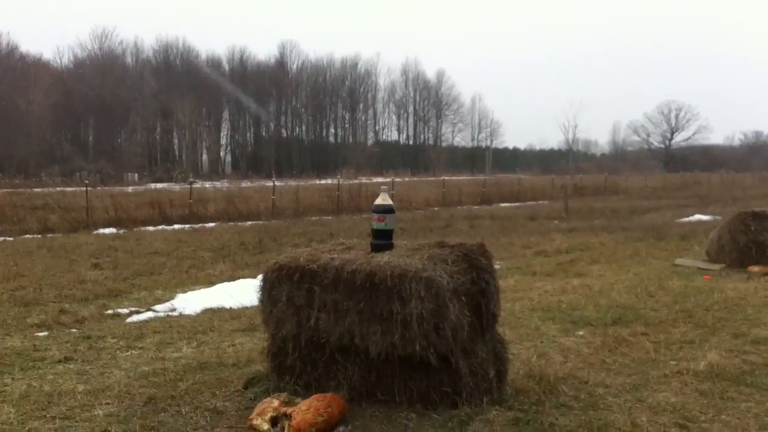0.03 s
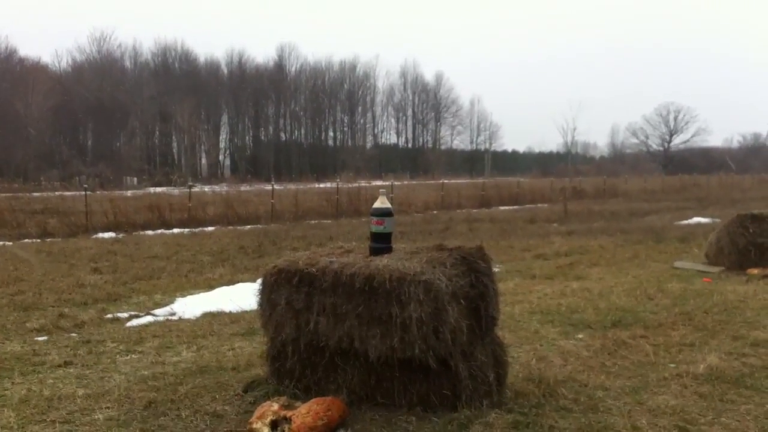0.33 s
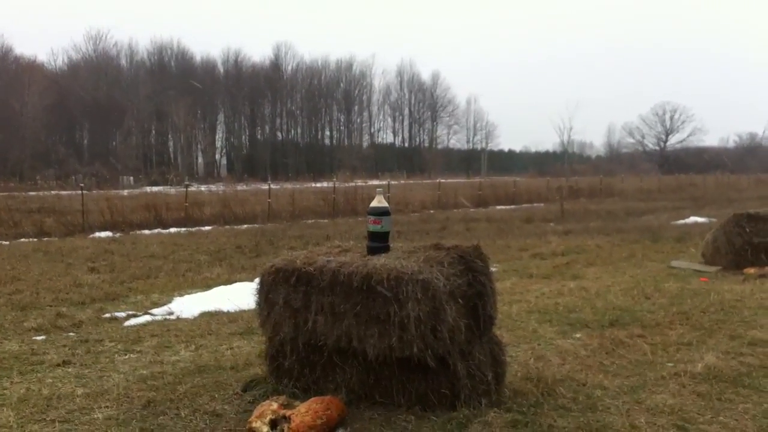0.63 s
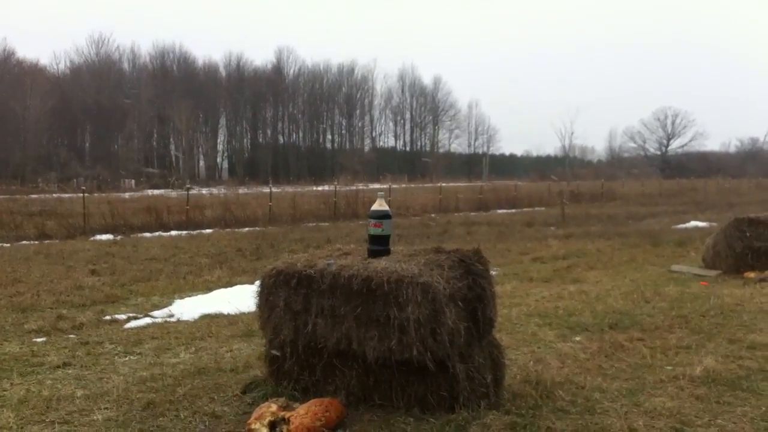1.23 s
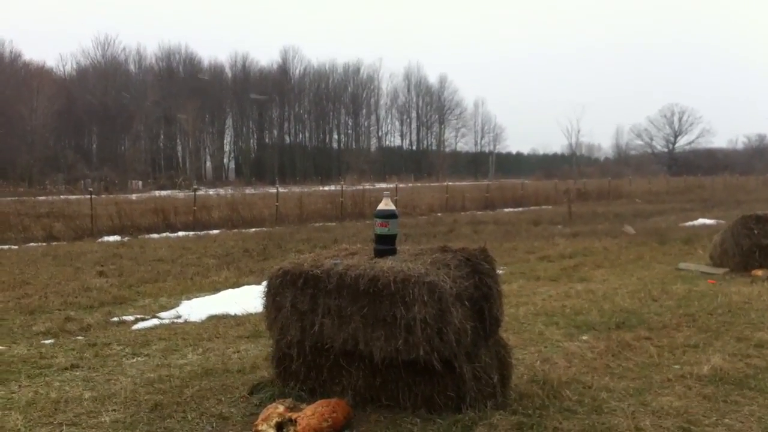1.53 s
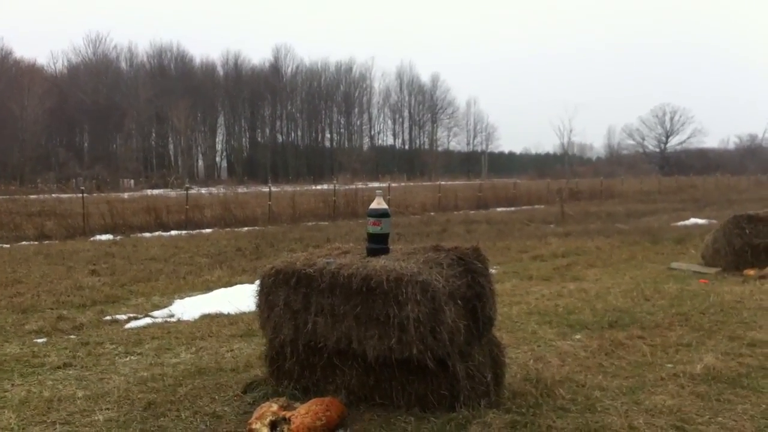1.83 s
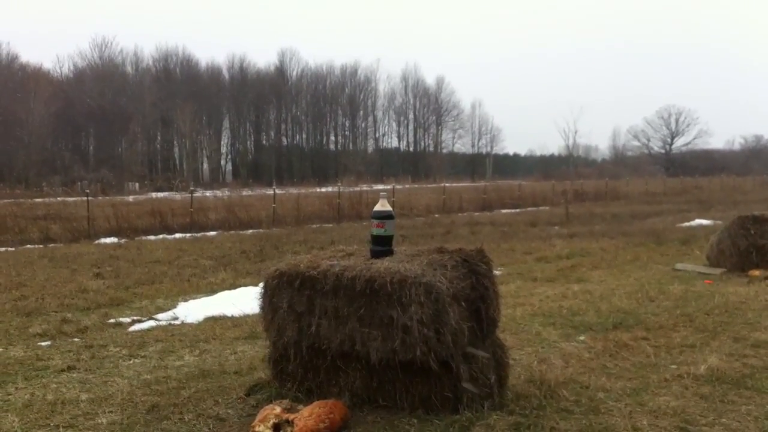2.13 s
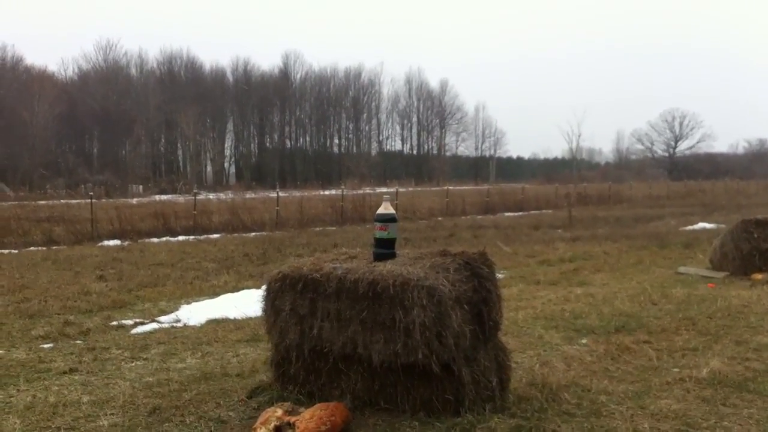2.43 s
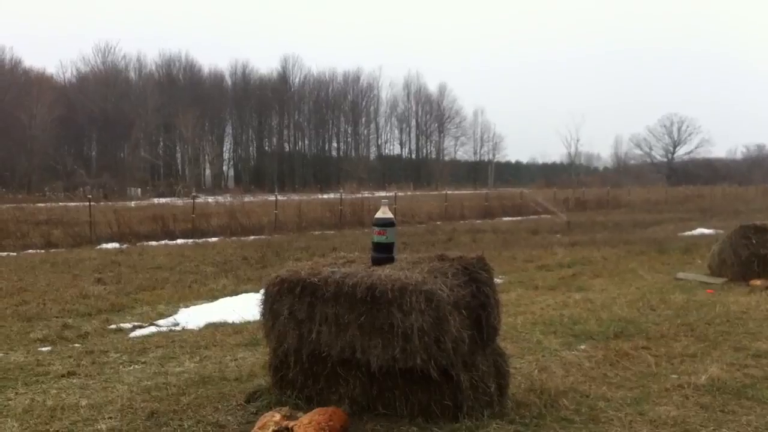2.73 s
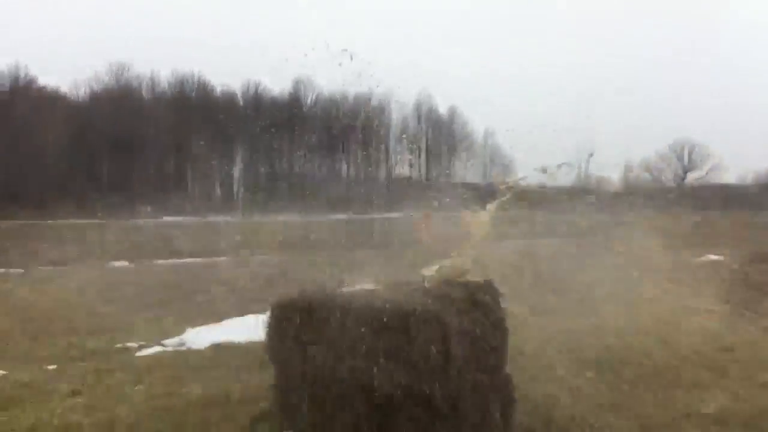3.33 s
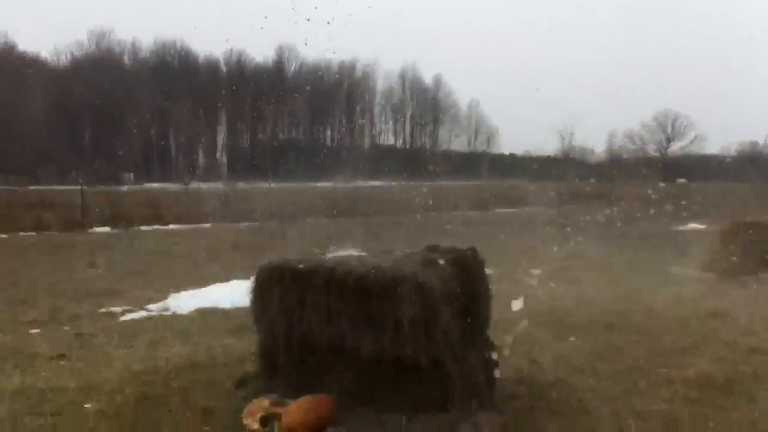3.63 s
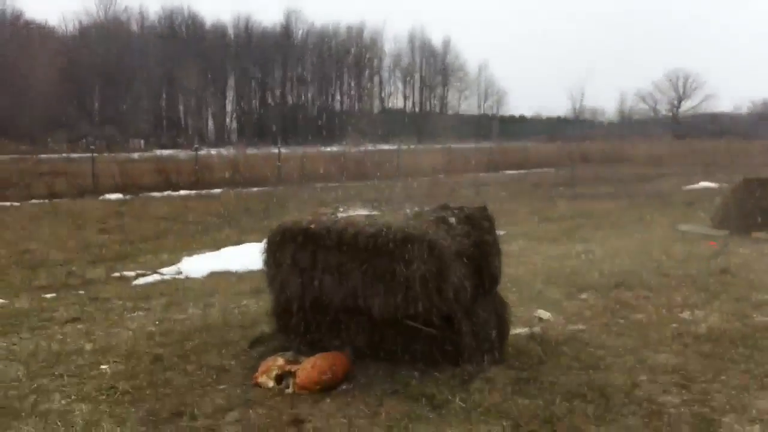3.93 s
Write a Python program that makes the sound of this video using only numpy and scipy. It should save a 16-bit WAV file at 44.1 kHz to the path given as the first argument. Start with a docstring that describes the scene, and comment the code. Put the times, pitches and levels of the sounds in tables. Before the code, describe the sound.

One loud blast breaks the still air and faint gusts of a field. The microphone goes deaf for an instant and recovers with a thump; echoes rattle over a dying roar as bits patter down and wind buffets it.

```python
"""A bottle on a hay bale blows up in an open field: a short tearing hiss runs into three shock cracks.
They overload the microphone, which sticks and goes deaf, then lets go with a thump.
Echoes rattle back over the fading roar of the field and debris patters down, while stirred air
buffets the microphone. Before the blast there is only a quiet bed of air and light puffs of wind."""
import sys
import numpy as np
from scipy import signal
from scipy.fft import rfft, irfft
from scipy.io import wavfile
from scipy.ndimage import uniform_filter1d

SR = 44100
rng = np.random.default_rng(int(sys.argv[2]) if len(sys.argv) > 2 else 0)


def digitize_waveform(pressure):
    """Quantize a signal to 16-bit integers and store it at the path in sys.argv[1].

    Rows of a 2-D input are taken as channels; values are limited to [-1, 1].
    """
    field = np.atleast_2d(pressure).T
    bounded = np.clip(field, -1, 1)
    quanta = np.round(bounded * 32767).astype(np.int16)
    wavfile.write(sys.argv[1], SR, quanta)


N = 176400
T = np.arange(N) / SR
DEAF_FROM_S, DEAF_UNTIL_S = 3.2, 3.345  # the microphone's overload


def amp(db):
    """Decibels to gain."""
    return 10 ** (np.asarray(db) / 20)


def unit(x):
    """Scales to rms 1."""
    return x / np.sqrt(np.mean(x ** 2) + 1e-20)


def curve_at(points, hz):
    """Reads a curve on a log-frequency axis."""
    f, value = np.transpose(points)
    return np.interp(np.log(hz + 1), np.log(f + 1), value)


def colour(x, eq):
    """Shapes x with an EQ curve, then scales to rms 1."""
    return unit(irfft(rfft(x) * amp(curve_at(eq, np.fft.rfftfreq(N, 1 / SR))), N))


def noise(eq):
    """Noise through an EQ curve, at rms 1."""
    return colour(rng.standard_normal(N), eq)


def fader(points):
    """Gain that rides through (time, dB) points."""
    return amp(np.interp(T, *np.transpose(points)))


def impacts(per_s, spread_db):
    """Random clicks, a few of them large."""
    sizes = amp(spread_db * np.minimum(rng.exponential(1, N), 4))
    return sizes * rng.choice([-1, 1], N) * (rng.random(N) < per_s / SR)


def strike(start, fall_s, rise_s=0.001, hold_s=0):
    """Envelope with a quick attack, a hold and an exponential decay."""
    attack = np.clip((T - start) / rise_s + 1, 0, 1)
    return attack * np.exp(-np.maximum(T - start - hold_s, 0) / fall_s)


def swells(rows, width_s=0.0061):
    """Envelope with a short bell round each (time, dB) row."""
    power = sum(amp(db) ** 2 * np.exp(-np.minimum(((T - s) / width_s) ** 2, 100)) for s, db in rows)
    return np.sqrt(power)


# Tone of the still air and of the ticks: f/Hz, level/dB
AIR_EQ = [(15, -44), (25, -21), (48, -16), (123, 0.5), (179, 0), (284, -8), (392, -6.5), (461, -5.5),
          (587, -7), (654, -9), (955, -12.5), (1470, -13), (15800, -19.5)]
TICK_EQ = [(200, -5.5), (500, -1.5), (900, -4.5), (1600, -2), (3000, -11.5), (9000, -14.5), (16000, -23.5)]
# Faint ticks before the blast: t/s, level/dB
TICKS = [(.599, -64), (.659, -61), (.833, -61.5), (1.47, -63.5), (3.137, -50.5)]


def background():
    """A bed of still field air, a thin electrical whine and a few ticks."""
    air = amp(-67) * noise(AIR_EQ)
    whine = amp(-86.5) * np.sqrt(2) * np.sin(2 * np.pi * 15000 * T)
    ticks = sum(amp(db) * strike(s, fall_s=0.0045) for s, db in TICKS) * noise(TICK_EQ)
    return air + whine + ticks


# Tone of the wind rumble, the eddies and their rasp: f/Hz, level/dB
WIND_EQ = [(20, -50.5), (35, -42.5), (74, -22.5), (115, -4), (160, 3.5), (230, -3), (340, -15.5),
           (500, -28.5), (900, -47), (2000, -79)]
EDDY_EQ = [(20, -32.5), (60, -15), (115, 0.5), (260, -1), (400, -6), (700, -15.5), (1500, -32.5),
           (2500, -48)]
RASP_EQ = [(100, -30), (300, -0.5), (380, 0), (580, -9.5), (850, -34), (2000, -64.5)]
# Centres of the puffs, and of the rasp on the sharpest ones: t/s, level/dB
PUFFS = [(.776, -53.5), (.828, -52), (.85, -48.5), (.912, -54.5), (1.0, -48), (1.044, -48.5),
         (1.915, -43.5), (1.942, -60), (2.14, -58.5), (2.167, -59), (2.197, -48.5), (2.262, -56.5),
         (2.301, -58), (2.473, -53.5), (2.512, -53), (2.54, -57), (2.592, -43), (2.626, -43), (2.651, -42),
         (2.702, -50.5), (2.853, -54.5), (2.884, -54.5), (2.928, -50), (2.972, -47.5), (2.995, -42),
         (3.041, -39), (3.056, -48), (3.072, -45.5), (3.107, -39.5), (3.152, -46), (3.168, -37),
         (3.398, -39), (3.426, -35), (3.449, -40), (3.469, -37.5), (3.515, -33.5), (3.53, -32),
         (3.551, -31.5), (3.642, -39), (3.745, -33.5), (3.765, -34.5), (3.805, -36), (3.821, -34),
         (3.845, -33), (3.864, -29), (3.899, -33), (3.936, -29), (3.969, -35.5), (3.988, -34.5)]
RASPS = [(1.915, -54), (2.198, -61), (2.995, -54.5), (3.041, -49), (3.168, -47), (3.515, -45), (3.549, -39),
         (3.821, -36), (3.845, -32.5), (3.936, -39)]
# Fader ride of the breeze: t/s, level/dB
BREEZE_RIDE = [(0, -83), (.7, -79), (.85, -62), (1.02, -69), (1.15, -86), (1.85, -76), (1.95, -61.5),
               (2.05, -79), (2.2, -61.5), (2.4, -79), (2.67, -58), (2.8, -70), (3.0, -56.5), (3.35, -44),
               (3.55, -45), (3.7, -53.5), (3.8, -40.5), (4.0, -36.5)]


def wind():
    """Puffs shed low, evenly strong eddies over the microphone, above a weak breeze."""
    rumble = noise(WIND_EQ)
    rumble_level = np.sqrt(abs(uniform_filter1d(rumble ** 2, size=400)) + 1e-6)
    eddies = colour(rumble / rumble_level, EDDY_EQ)
    breeze = fader(BREEZE_RIDE) * noise(WIND_EQ)
    puffs = amp(0.5) * eddies * swells(PUFFS)
    rasp = noise(RASP_EQ) * swells(RASPS)
    return puffs + rasp + breeze


# Tone of the midrange patter and the bright spray: f/Hz, level/dB
PATTER_EQ = [(100, -22.5), (500, 1), (1100, 5), (2000, -2), (3400, -8.5), (4800, -18.5), (8000, -28),
             (12500, -26.5), (15800, -44)]
SPRAY_EQ = [(2000, -28.5), (5000, -0.5), (8000, -9), (12500, -7.5), (15800, -18)]
# Fader ride of the patter: t/s, level/dB
PATTER_RIDE = [(3.345, -55), (3.55, -50), (3.7, -43), (3.76, -47.5), (3.87, -43), (4.0, -43.5)]
# Drops spattering nearby: t/s, level/dB
DROPS = [(3.495, -51), (3.764, -52), (3.792, -50), (3.823, -53), (3.86, -51)]


def debris(spray_peak_s=3.73, spray_width_s=0.18):
    """Small bits patter down, with a swell of fine spray and a few near drops."""
    bits = colour(impacts(per_s=2500, spread_db=3.5), PATTER_EQ) * fader(PATTER_RIDE)
    spray_level = amp(-59) * np.exp(-0.5 * ((T - spray_peak_s) / spray_width_s) ** 2)
    spray = colour(impacts(per_s=1300, spread_db=1), SPRAY_EQ) * spray_level
    drops = noise(SPRAY_EQ) * sum(amp(db) * strike(s, fall_s=0.003) for s, db in DROPS)
    return bits + spray + drops


# Tone of the roar as it starts: f/Hz, level/dB
ROAR_EQ = [(60, -30), (200, 8), (600, -0.5), (1000, -0.5), (1550, 4), (2300, 0.5), (2900, 2.5), (4200, -8),
           (6000, -9), (8000, -16), (12500, -20), (15800, -36)]
# Decay time across the roar's spectrum: f/Hz, T60/s
ROAR_DECAY = [(200, 1.25), (1500, 0.76), (4000, 1.24), (12000, 0.88)]
# Partials ringing after the blast: f/Hz, level/dB, T60/s
RING_PARTIALS = [(1507, -52, 1.1), (1552, -46, 1.3), (1616, -48, 1.2), (1890, -57, 1.2)]


def roar():
    """Scattered echoes from the field blur into a dying tail with a faint ring."""
    scatter = colour(impacts(per_s=15000, spread_db=2), ROAR_EQ)
    hz, t, bands = signal.stft(scatter, SR, nperseg=256)
    decay_db = -60 * np.maximum(t - DEAF_UNTIL_S, 0) / curve_at(ROAR_DECAY, hz)[:, None]
    wash = signal.istft(bands * amp(decay_db), SR)[1][:N]
    age = np.maximum(T - DEAF_UNTIL_S, 0)
    ring = sum(amp(db - 60 * age / t60) * np.sin(2 * np.pi * (f * age + rng.random()))
               for f, db, t60 in RING_PARTIALS)
    return amp(-34) * wash + ring


# Tone of a slap: f/Hz, level/dB
ECHO_EQ = [(150, -18), (600, -4.5), (1150, 1.5), (1600, -0.5), (2300, -8.5), (3200, -11), (4500, -17.5),
           (8000, -30.5), (16000, -52)]
# Slaps off fence posts and trees: t/s, level/dB, treble shelf/dB
ECHOES = [(3.346, -30, 0), (3.353, -29.5, -3), (3.364, -29.5, -6), (3.382, -34, -10), (3.391, -35.5, -11),
          (3.397, -32.5, -12), (3.443, -36, 7), (3.461, -30.5, 2), (3.483, -33, -1), (3.494, -35, 5),
          (3.512, -35, 8.5), (3.536, -35, 5), (3.558, -33, 3.5), (3.565, -37, 2), (3.586, -34, -3),
          (3.606, -39, 4), (3.638, -32, -3.5), (3.651, -38.5, -3), (3.667, -37, 1), (3.688, -37, 0),
          (3.71, -42.5, -3), (3.729, -35, -4), (3.763, -42, 4), (3.782, -36.5, -2), (3.803, -36.5, -4),
          (3.821, -37, -1), (3.84, -37, 1), (3.864, -34, -6), (3.885, -35.5, -6), (3.907, -35.5, -6),
          (3.932, -40, -5), (3.952, -38.5, -8), (3.97, -40, -10), (3.995, -39.5, -3)]


def echoes(shelf_hz=3700, tint_db=2):
    """Each echo is a brief smeared slap, slightly coloured by what threw it back."""
    rattle = np.zeros(N)
    for s, db, treble_db in ECHOES:
        eq = [(f, level + treble_db * (f > shelf_hz) + tint_db * rng.standard_normal())
              for f, level in ECHO_EQ]
        rattle += amp(db) * strike(s, fall_s=0.003, rise_s=0.00091, hold_s=0.0036) * noise(eq)
    return rattle


# Tone of the tearing hiss: f/Hz, level/dB
TEAR_EQ = [(200, -15.5), (1500, -15), (2800, -6.5), (4200, -7), (6500, 0), (8500, -5.5), (10000, -8.5),
           (12000, -7), (16000, -20)]


def tear(end_s=3.1828, length_s=0.008, hold_s=0.0028, rise_db_per_s=3600, fall_s=0.0032):
    """A bright hiss swells and holds up to the first shock, then drops to a short tail."""
    age = T - end_s
    swell = amp(rise_db_per_s * np.minimum(age + hold_s, 0)) * (age > -length_s)
    tail = amp(-11) * np.exp(-abs(age) / fall_s)
    return amp(-18.5) * np.where(age < 0, swell, tail) * noise(TEAR_EQ)


def mic_bass_cut(x, ring_hz=166, q=1.45, low_hz=137):
    """The microphone's steep bass cut, which rings briefly at its edge and turns steps into thumps."""
    w = 2 * np.pi * ring_hz
    ringing = signal.lfilter(*signal.bilinear([1, 0, 0], [1, w / q, w * w], SR), x)
    b, a = signal.butter(1, low_hz, "high", fs=SR)
    return signal.lfilter(b, a, signal.lfilter(b, a, ringing))


# Three shock cracks, then the overloaded microphone sticks and lets go with a thump:
# t/s, relative spike height, relative step height
CRACKS_AND_OVERLOAD = [ (3.18283, .68, -.66), (3.18367, .58, -.07), (3.18662, .72, -.05), (3.2220, 0, .012),
                       (3.32770, 0, .78), ]


def blast(spike_s=0.00006, top_hz=13000):
    """The hiss runs into three shock cracks; the overloaded mic sticks, then lets go with a thump."""
    mic_signal = np.zeros(N)
    for s, spike, step in CRACKS_AND_OVERLOAD:
        onset = np.clip((T - s) * SR, 0, 1)
        held = np.clip((T - s - spike_s) * SR, 0, 1)
        mic_signal += spike * (onset - held) + step * held
    rounded = signal.lfilter(*signal.butter(1, top_hz, fs=SR), mic_signal)
    return mic_bass_cut(amp(-0.5) * rounded + tear())


def scene():
    """The mix: overload ducks the bed and mutes the wind; the aftermath opens as the mic recovers."""
    recovered = np.clip((T - DEAF_UNTIL_S) / 0.00092 + 1, 0, 1)
    deaf = np.clip((T - DEAF_FROM_S) / 0.014, 0, 1) * (1 - recovered)
    aftermath = recovered * (roar() + echoes() + debris())
    ambience = background() * amp(-16 * deaf) + wind() * (1 - deaf)
    return (ambience + blast() + aftermath)[None]


def record(dry):
    """A steep low-pass takes off the top above 16 kHz."""
    low_pass = signal.firwin(255, 16000, window=("kaiser", 8), fs=SR)
    return signal.oaconvolve(dry, low_pass[None], "same")


dry = scene()
out = record(dry)
digitize_waveform(out)
```